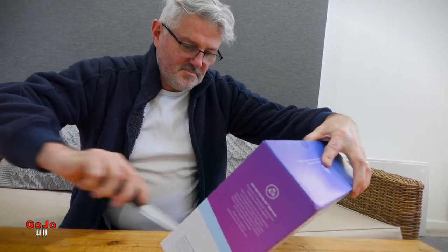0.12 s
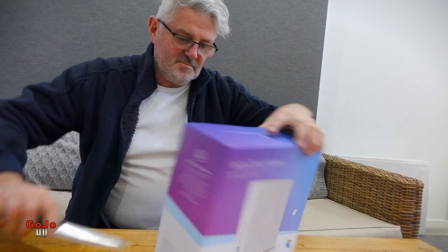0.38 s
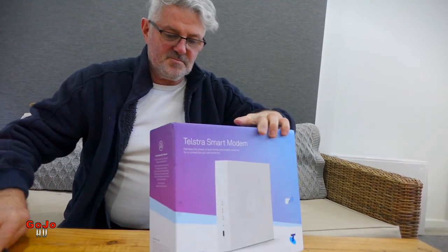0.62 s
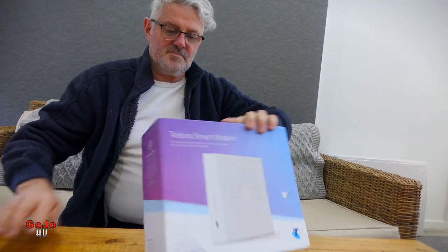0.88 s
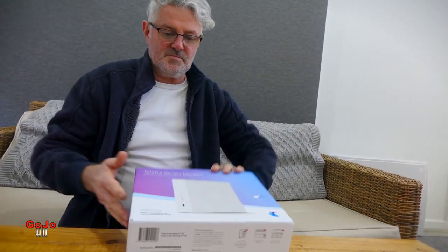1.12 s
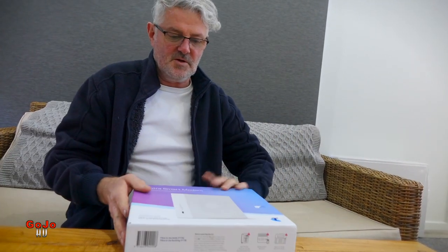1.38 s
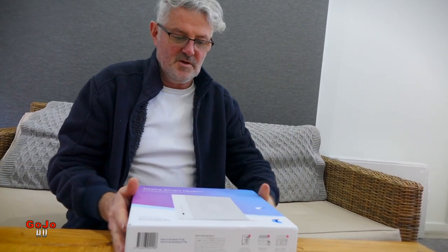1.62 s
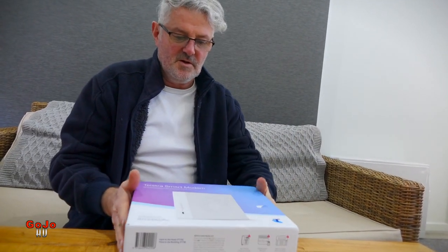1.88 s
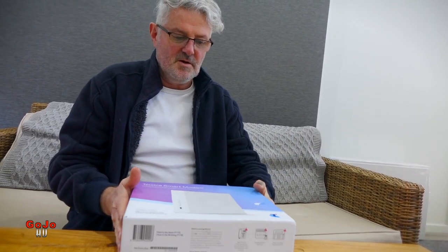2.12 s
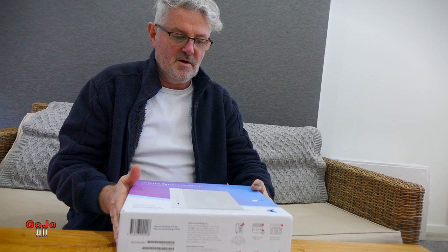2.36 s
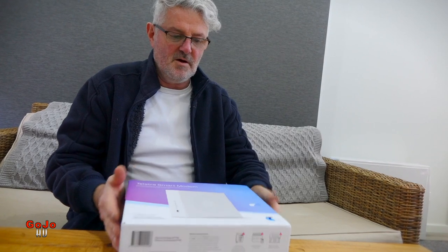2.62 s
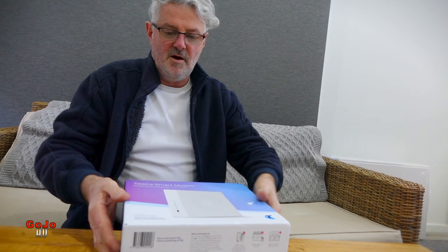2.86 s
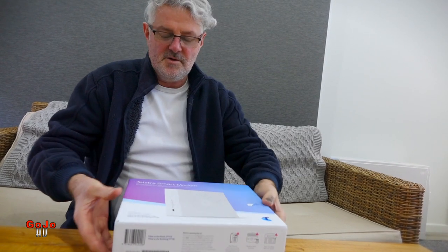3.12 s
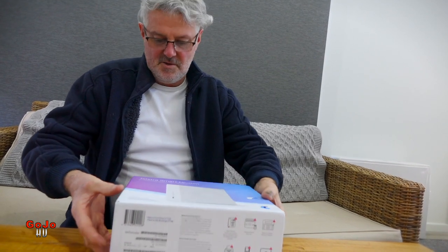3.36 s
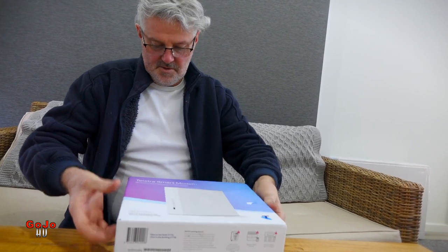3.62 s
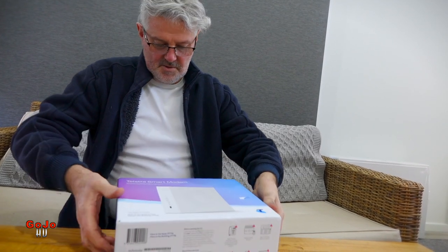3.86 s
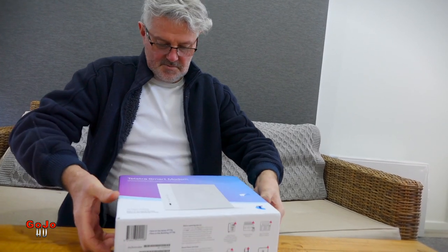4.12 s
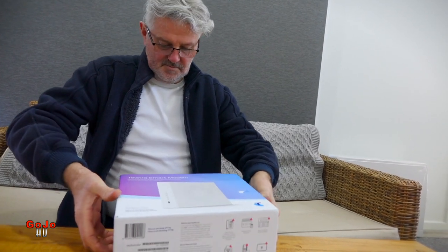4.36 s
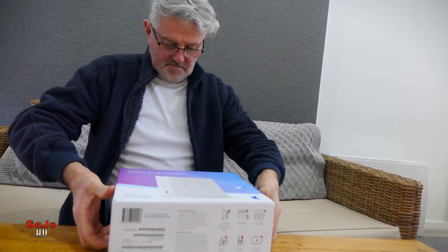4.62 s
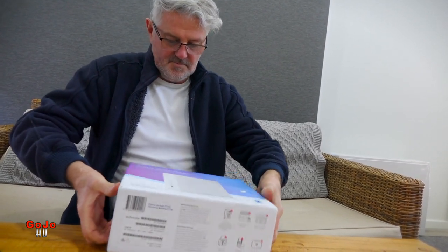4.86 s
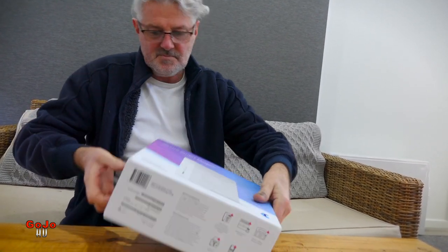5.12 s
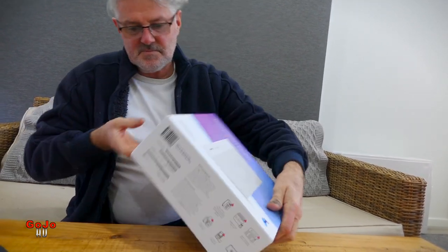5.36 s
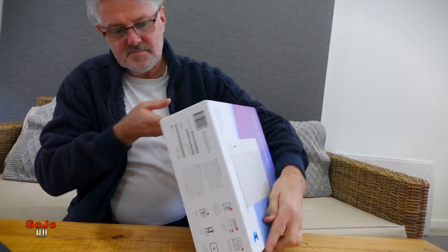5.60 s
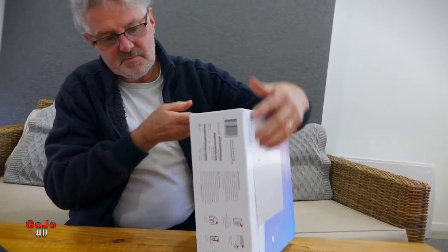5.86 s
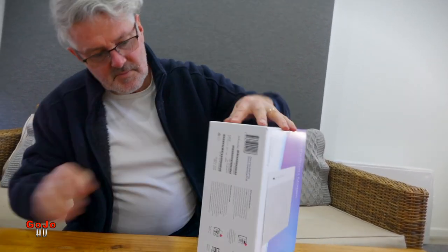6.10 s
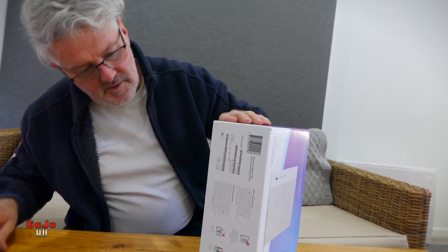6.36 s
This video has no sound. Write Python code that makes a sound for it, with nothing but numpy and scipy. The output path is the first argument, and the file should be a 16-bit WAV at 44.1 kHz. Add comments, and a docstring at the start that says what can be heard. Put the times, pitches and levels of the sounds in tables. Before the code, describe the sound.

Close, dry handling of a cardboard box at a wooden table. Sharp snaps and hollow knocks crowd the first second and a half, with gritty scraping between them. A solid knock follows in the middle, then soft shuffles, fingertip taps and brief rubbing. Near the end the box is turned and bumped lightly, with tiny skin squeaks. Slight short room echo over low steady background noise.

```python
"""A stiff cardboard box is cut, turned, set down and slid about on a wooden table in a small soft room.
Knocks make the box and the table top ring; edges and the blade tick in short cracks of noise.
Card drags on wood in many tiny catches, rasps under blade and fingers, and palms hiss over the glossy print.
Fingertips squeak now and then. A camera microphone with a presence peak hears it over a faint room rumble."""
import sys
import numpy as np
from scipy import signal
from scipy.fft import rfft, irfft
from scipy.io import wavfile
from scipy.ndimage import uniform_filter1d

SR = 44100
rng = np.random.default_rng(int(sys.argv[2]) if len(sys.argv) > 2 else 0)


def inscribe(sig):
    """Save sig as 16-bit PCM at rate SR to the path in sys.argv[1].

    A 1-D sig is mono; a 2-D sig holds one channel per row.
    Samples are clipped to [-1, 1] before scaling.
    """
    pcm = np.round(np.clip(np.atleast_2d(sig).T, -1, 1) * 32767)
    wavfile.write(sys.argv[1], SR, pcm.astype(np.int16))


def attenuation_scalar(level_db):
    """Turn a level in dB into a linear amplitude multiplier (20 dB per decade)."""
    decades = np.asarray(level_db, float) / 20
    return 10 ** decades


N = 285768  # length in samples


def unit(x):
    """Scale to an average (rms) level of 1."""
    return x / np.sqrt(np.mean(x ** 2))


def band(x, lo_hz, hi_hz, order=2):
    """Keep only the sound between two frequencies."""
    return signal.sosfilt(signal.butter(order, [lo_hz, hi_hz], "band", fs=SR, output="sos"), x)


def pushes(s, size):
    """Single-sample pushes at the given times in seconds."""
    out = np.zeros(N)
    np.add.at(out, np.minimum((s * SR).astype(int), N - 1), size)
    return out


def fade(s, size, tau):
    """Envelope that swells for tau seconds after each time, then dies away."""
    r = np.exp(-1 / (tau * SR))
    return signal.lfilter([np.e * (1 - r)], [1, -2 * r, r * r], pushes(s, size))


def ring(push, hz, t60):
    """One way the panel vibrates: each push of size 1 starts a fading sine of height 1."""
    w = 2 * np.pi * hz / SR
    r = np.exp(-np.log(1000) / (t60 * SR))
    return signal.lfilter([np.sin(w)], [1, -2 * r * np.cos(w), r * r], push)


def soften(push, hz):
    """Spread each push in time: broad panels take part of a cycle to get moving."""
    contact = np.hanning(int(.6 * SR / hz) + 3)
    return signal.lfilter(contact / contact.sum(), 1, push)


def walk(rate):
    """Wandering level that glides between random values, rate of them per second."""
    k = int(SR / rate)
    held = np.repeat(rng.standard_normal(N // k + 1), k)
    return uniform_filter1d(held, k)[:N]


def grit(rate, spread_db, smooth):
    """Stick-slip: uneven catches, none far above the rest, over a smooth share of noise."""
    size_db = spread_db * np.minimum(rng.exponential(size=N), 2)
    happens = rng.random(N) < rate / SR
    catch = happens * attenuation_scalar(size_db) * rng.standard_normal(N)
    return unit(catch) + smooth * rng.standard_normal(N)


def gestures(s, hold, rise, fade_s, db, rest_db):
    """Level in dB of overlapping movements; each climbs, holds and falls at its own pace."""
    t = np.arange(0, N + 128, 128) / SR
    before = (s - t[:, None]) / rise
    after = (t[:, None] - s - hold) / fade_s
    away = np.maximum(np.maximum(before, after), 0)
    power = np.sum(attenuation_scalar(db - 10 * away) ** 2, axis=1) + attenuation_scalar(rest_db) ** 2
    return np.interp(np.arange(N) / SR, t, 10 * np.log10(power))


SMALL_SPREAD_DB = 3.5


def small(count, level_db, top_db):
    """Chance moments, the level there (capped, then scattered), and two spare random draws each."""
    at = rng.integers(0, N, count)
    scatter, one, two = rng.standard_normal((count, 3)).T
    db = np.minimum(level_db[at], top_db) + SMALL_SPREAD_DB * scatter
    return at / SR, db, one, two


# colour of the still room: f/Hz, level/dB (only the shape counts)
ROOM_TONE = [(12, -14), (20, 15), (172, -34), (301, -2.5), (590, -51), (660, -13), (759, -18.5),
             (1150, -17), (1260, -19), (1810, -28.5), (2750, -30.5), (16000, -69)]
ROOM_TONE_DB = -44.5  # overall rms


def room_tone():
    """Steady noise of house and microphone: random noise shaped to the colour above."""
    hz, db = np.transpose(ROOM_TONE)
    f = np.fft.rfftfreq(N, 1 / SR)
    colour = attenuation_scalar(np.interp(np.log(f + 1), np.log(hz), db))
    return attenuation_scalar(ROOM_TONE_DB) * unit(irfft(rfft(rng.standard_normal(N)) * colour, N))


def room(x, t60_low, t60_high, split_hz, soft_hz):
    """Dense echoes after a few ms; cushions swallow the top and the treble dies first."""
    t = np.arange(int(.8 * SR)) / SR
    noise = rng.standard_normal(len(t))
    low = signal.sosfilt(signal.butter(1, split_hz, fs=SR, output="sos"), noise)
    tail = low * 1000 ** (-t / t60_low) + (noise - low) * 1000 ** (-t / t60_high)
    tail = tail * np.clip((t - .004) / 0.0033, 0, 1)
    tail = signal.sosfilt(signal.butter(2, soft_hz, fs=SR, output="sos"), tail)
    return signal.fftconvolve(x, tail / np.sqrt(np.sum(tail ** 2)))[:N]


# fingertip squeaks on the gloss: t/s, f/Hz, level/dB
SQUEAKS = [(5.759, 3880, -47), (6.266, 4800, -47), (6.344, 4500, -50), (6.344, 3660, -54)]


def squeaks():
    """Skin slips for a few ms at a high steady rate, heard as a tiny pure tone."""
    t = np.arange(N) / SR
    out = np.zeros(N)
    for s, hz, db in SQUEAKS:
        out += attenuation_scalar(db) * np.exp(-((t - s) / 0.0029) ** 2) * np.sin(2 * np.pi * hz * t)
    return out


# palms gliding over the gloss: start t/s, hold t/s, rise t/s per 10 dB, level/dB
PALMS = [(0, .02, .06, -69), (.165, .13, .02, -59), (.228, .015, .018, -47), (.465, .02, .05, -63),
         (.525, .01, .015, -58), (.562, .01, .015, -48), (.86, .19, .025, -58.5), (1.08, .02, .025, -46),
         (1.3, .02, .03, -53), (1.39, .01, .015, -55), (1.48, .015, .025, -52), (1.72, .01, .02, -60),
         (1.78, .01, .018, -58), (1.85, .07, .012, -55), (2.015, .01, .012, -53), (2.5, .115, .025, -54),
         (2.71, .08, .03, -59), (2.87, .05, .05, -67), (2.98, .012, .03, -61), (3.055, .01, .04, -66),
         (3.165, .01, .025, -66), (3.585, .01, .025, -64), (3.66, .045, .02, -52), (3.85, .03, .04, -58),
         (4.105, .01, .02, -57), (4.2, .05, .04, -64), (4.7, .07, .04, -66), (4.82, .06, .03, -67),
         (4.97, .16, .045, -61), (5.19, .05, .05, -57), (5.55, .17, .2, -57), (5.83, .11, .07, -48),
         (6.13, .01, .03, -63), (6.27, .02, .03, -55), (6.34, .05, .1, -65)]
PALM_FADE_OVER_RISE = 1.2
REST_HISS_DB = -79.5  # hands never quite leave the box


def palms(judder_db):
    """Skin on gloss makes many fine catches in smooth noise: a hiss that judders a little."""
    s, hold, rise, db = np.transpose(PALMS)
    hiss_db = gestures(s, hold, rise, PALM_FADE_OVER_RISE * rise, db, REST_HISS_DB)
    skin = grit(rate=2500, spread_db=1, smooth=2)
    hiss = unit(band(skin, 4900, 14800))
    return attenuation_scalar(hiss_db + 0.56 * judder_db) * hiss


# rasps of blade and fingers on the card: t/s of most pressure, rise t/s per 10 dB,
# fade t/s per 10 dB, level/dB
RASPS = [(0, .1, .15, -61), (.235, .033, .03, -34), (.29, .05, .12, -50), (.473, .1, .02, -54),
         (.527, .008, .055, -36), (.86, .015, .2, -40), (1.088, .03, .07, -36.5), (1.313, .1, .2, -53),
         (1.425, .1, .09, -50), (1.75, .04, .07, -52), (1.9, .1, .07, -55), (2.017, .05, .05, -55),
         (2.49, .05, .3, -58), (2.6, .08, .03, -58), (2.704, .03, .08, -44), (2.99, .06, .12, -57),
         (3.17, .05, .03, -58), (3.44, .3, .2, -64), (3.59, .025, .1, -58), (3.685, .035, .1, -41),
         (3.873, .15, .13, -52), (4.109, .02, .03, -41.5), (4.3, .2, .55, -57), (4.975, .08, .3, -59),
         (5.13, .2, .2, -57), (5.4, .1, .15, -57), (5.593, .25, .25, -56), (5.861, .045, .2, -50.5),
         (6.212, .08, .5, -55)]
REST_RASP_DB = -72


def rasp_level():
    """Level of the rasp in dB, following the pressure on the card."""
    s, rise, fade_s, db = np.transpose(RASPS)
    return gestures(s, 0, rise, fade_s, db, REST_RASP_DB)


def rasps(judder_db):
    """Blade and fingers catch on dense card fibres and rasp."""
    fibres = grit(rate=1000, spread_db=5.5, smooth=0.7)
    rasp = unit(band(fibres, 1000, 3770))
    return attenuation_scalar(rasp_level() + judder_db) * rasp


def strokes():
    """Rasp and hiss of the hands, juddering together."""
    judder_db = 2.5 * walk(70)
    return rasps(judder_db) + palms(judder_db)


SMALL_TICKS, TICK_OVER_RASP_DB = 75, 13
SMALL_TICK_TOP_DB = -42  # cap before the scatter


def small_ticks():
    """Ticks at chance moments, louder where the card is rubbed harder."""
    s, db, sharp, _ = small(SMALL_TICKS, rasp_level() + TICK_OVER_RASP_DB, SMALL_TICK_TOP_DB)
    return np.transpose([s, db, db - 17 + 6 * sharp])


# ticks of blade, nails and flap edges: t/s, main level/dB, top level/dB (both raised in ticks())
TICKS = [(.0422, -31.5, -47), (.1581, -12, -27.5), (.4753, -28.5, -38.5), (.483, -30, -44),
         (.4958, -25.5, -50), (.5196, -25, -39), (.5292, -13.5, -29), (.5626, -18, -35),
         (.7043, -30.5, -66), (.8046, -33, -57), (.8235, -26, -45), (.848, -9, -33), (.8654, -21, -56),
         (1.2471, -54, -36), (1.279, -34, -21), (1.296, -26, -46), (1.3189, -18, -43), (1.3636, -30, -38),
         (1.712, -40, -52), (1.7838, -38, -59), (2.0068, -27, -46), (2.0815, -46, -53), (2.2084, -40, -51),
         (2.3571, -56, -53), (2.4083, -45, -53), (2.4512, -42, -52), (2.692, -23, -37),
         (2.7074, -27, -37.5), (2.7806, -30.5, -70), (2.9238, -35, -47), (2.9467, -36, -52),
         (3.051, -36.5, -50), (3.1637, -41, -59), (3.2061, -44, -70), (3.2216, -40, -70),
         (3.3283, -44, -65), (3.4256, -38, -62), (3.4436, -33, -64), (3.458, -33, -70), (3.5972, -32, -65),
         (3.6386, -32, -43), (3.692, -20, -42), (4.0577, -26, -58), (4.0831, -35, -58), (4.0991, -26, -44),
         (4.4268, -39.5, -67), (4.6932, -42, -54), (4.7716, -41, -68), (4.814, -44, -53), (4.859, -29, -62),
         (4.9686, -34, -62), (4.9857, -36, -52), (5.0219, -31.5, -42.5), (5.1153, -38, -46),
         (5.1562, -35, -47), (5.4191, -37, -52), (5.8448, -28.5, -48), (5.882, -36, -50),
         (6.1335, -37.5, -53), (6.1848, -37, -63), (6.2272, -34, -64)]


def ticks():
    """Each tick is a short crack of noise, with an even shorter burst of treble of its own level."""
    s, db, top_db = np.vstack([TICKS, small_ticks()]).T
    noise = rng.standard_normal((2, N))
    crack = band(fade(s, attenuation_scalar(db + 1), 0.0011) * noise[0], 1000, 3750)
    treble = band(fade(s, attenuation_scalar(top_db + 7), 0.00024) * noise[1], 6000, 12800)
    return crack + treble


# drags of the card over the table: t/s of most weight, rise t/s per 10 dB, fade t/s per 10 dB,
# weight level/dB, scrape level/dB
DRAGS = [(0, .1, .3, -51, -59), (.2, .025, .15, -39, -49), (.56, .07, .065, -33, -39),
         (.89, .06, .27, -33, -31), (1.35, .1, .11, -39, -41), (1.75, .05, .35, -44, -55),
         (2.25, .3, .3, -51, -63), (2.46, .08, .11, -48, -57), (2.73, .06, .35, -37, -46),
         (3.5, .4, .2, -53, -54), (3.7, .06, .09, -40, -37), (3.9, .15, .07, -46, -44),
         (4.14, .08, .5, -44, -47), (4.36, .1, .08, -52, -51), (4.9, .2, .35, -43, -49),
         (5.17, .08, .1, -43, -50), (5.43, .12, .17, -43, -51), (5.7, .2, .2, -58, -57),
         (5.89, .04, .09, -44, -45), (6.18, .05, .09, -45, -53), (6.46, .15, .2, -46, -49)]
REST_DRAG_DB, REST_SCRAPE_DB = -60, -68


def drag_levels():
    """Levels in dB of the weight (low part) and scrape (high part) of the dragged card."""
    s, rise, fade_s, weight_db, scrape_db = np.transpose(DRAGS)
    drag_db = gestures(s, 0, rise, fade_s, weight_db, REST_DRAG_DB)
    return drag_db, gestures(s, 0, rise, fade_s, scrape_db, REST_SCRAPE_DB)


# ways the box vibrates (modes), rung by sliding() and knocks(): f/Hz, relative level/dB,
# t/s to fade by 60 dB when knocked
MODES_BOX = [(119.6, -11, 0.065), (152, 0, 0.05), (183.7, -3.5, 0.09), (204, -5, 0.08), (243.6, -1, 0.048),
             (262.4, -13, 0.14), (304, -1, 0.091), (357.7, -3.5, 0.14), (394.6, -2, 0.067),
             (463, -5.5, 0.14), (517, -2, 0.08), (585, -3, 0.056), (654.5, 0, 0.055), (722, -6, 0.048),
             (751, -3, 0.062), (888, -1, 0.033), (985, -3, 0.047), (1150, 2, 0.024), (1326, -1.5, 0.028),
             (1550, 0, 0.02), (1805, -3, 0.022), (2020, -3.5, 0.017)]


def sliding():
    """Catches of the dragged card shake the box modes, low and high, each with its own sign."""
    drag_db, scrape_db = drag_levels()
    judder_db = 2.5 * walk(40)
    catches = grit(rate=400, spread_db=3.5, smooth=.6) * attenuation_scalar(judder_db)
    low, high = np.zeros(N), np.zeros(N)
    for hz, db, t60 in MODES_BOX:
        sign = rng.choice([-1, 1])
        part = low if hz < 600 else high
        part += sign * attenuation_scalar(db) * ring(catches, hz, 0.75 * t60)  # fades sooner than a knock
    return attenuation_scalar(drag_db) * unit(low) + attenuation_scalar(scrape_db) * unit(high)


SMALL_TAPS, TAP_OVER_DRAG_DB, TAP_BODY_HZ = 40, 5, 190
SMALL_TAP_TOP_DB = -42  # cap before the scatter


def small_taps():
    """Light taps of the box at chance moments, louder where it is dragged harder."""
    s, db, place, hard = small(SMALL_TAPS, drag_levels()[0] + TAP_OVER_DRAG_DB, SMALL_TAP_TOP_DB)
    body_hz = TAP_BODY_HZ * np.exp(.25 * place)
    return np.transpose([s, db, body_hz, db - 3 + 4 * hard, db - 9])


def thuds(s, hz, db, cycles):
    """The dead first swing or two of the struck face, gone within a few cycles."""
    out = np.zeros(N + SR)
    t = np.arange(SR // 10) / SR
    for start, f, size in zip((s * SR).astype(int), hz, attenuation_scalar(db)):
        age = t * f / cycles
        swell = np.e * age * np.exp(-age * np.e)
        out[start:start + len(t)] -= size * swell * np.sin(2 * np.pi * f * t)
    return out[:N]


# knocks of the box: t/s, hollow body level/dB, centre of the body f/Hz, hard edge level/dB,
# table thump level/dB (levels are shifted in knocks())
KNOCKS = [(.158, -22, 330, -10, -55), (.18, -23, 176, -41, -46), (.275, -22, 185, -28, -42),
          (.521, -13, 190, -18, -13), (.528, -7, 180, -17, -22), (.562, -16, 208, -20, -41),
          (.597, -26, 452, -27, -33), (.704, -29, 400, -21, -57), (.804, -29, 265, -34, -40),
          (.848, -8, 400, .5, -34), (.865, -16, 400, -14, -38), (.904, -15, 402, -12, -51),
          (.916, -23, 368, -13, -47), (.942, -28, 256, -16, -40), (.995, -38, 398, -22, -60),
          (1.108, -16, 510, -12.5, -44), (1.32, -2, 172, -17, -26), (1.335, -16.5, 227, -40, -32),
          (1.362, -22, 191, -29, -51), (1.692, -37, 200, -50, -55), (1.719, -17, 236, -30, -40),
          (1.746, -33, 180, -29, -44), (1.896, -33, 162, -44, -44), (2.008, -37, 227, -29, -46),
          (2.02, -32, 165, -29, -39), (2.449, -34, 178, -34, -60), (2.692, -5, 240, -12, -15),
          (2.707, -9, 510, -13, -30), (2.723, -15, 480, -21, -23), (2.78, -45, 433, -27, -48),
          (2.924, -38, 180, -31, -54), (3.05, -37, 159, -31, -60), (3.167, -40, 167, -38, -42),
          (3.206, -34, 274, -33, -45), (3.327, -36, 169, -32, -57), (3.426, -39, 132, -30, -46),
          (3.444, -30, 340, -30, -49), (3.596, -35, 132, -30, -36), (3.636, -27, 193, -36, -38),
          (3.654, -27, 173, -38, -33), (3.683, -23, 164, -31, -29), (3.691, -24, 724, -26, -32),
          (3.704, -28, 238, -21, -45), (3.721, -25, 184, -28, -34), (3.904, -31, 191, -38, -38),
          (4.085, -28, 361, -26, -44), (4.097, -20, 185, -26, -40), (4.192, -33, 176, -40, -48),
          (4.239, -23, 178, -34, -47), (4.312, -38, 186, -37, -48), (4.399, -44, 178, -45, -40),
          (4.469, -35, 164, -50, -51), (4.694, -40, 305, -32, -60), (4.774, -40, 165, -31, -55),
          (4.86, -23, 190, -22, -36), (4.969, -33, 458, -28, -55), (5.022, -35, 248, -26, -50),
          (5.117, -26, 175, -26, -47), (5.152, -25, 191, -37, -36), (5.167, -28, 250, -36, -44),
          (5.211, -34, 248, -44, -41), (5.396, -31, 254, -30, -41), (5.414, -26, 198, -38, -35),
          (5.517, -34, 260, -27, -58), (5.846, -16, 260, -17, -26), (5.857, -24, 270, -29, -34),
          (5.885, -40, 266, -29, -52), (5.917, -36, 242, -32, -50), (6.093, -45, 418, -34, -58),
          (6.135, -25, 178, -33, -51), (6.185, -31, 130, -24, -35), (6.23, -34, 280, -29, -39),
          (6.42, -34, 390, -24, -32), (6.437, -30, 390, -32, -49)]
EDGE_HZ, EDGE_CENTRE_HZ = 850, 1080  # modes above the first follow the edge level
TABLE_HZ, TABLE_T60_S = 73, 0.155


def knocks():
    """Each blow thuds, rings the modes near its body and edge centres and thumps the table."""
    s, body_db, body_hz, edge_db, thump_db = np.vstack([KNOCKS, small_taps()]).T[:, :, None]
    hz, mode_db, t60 = np.transpose(MODES_BOX)
    spot = rng.standard_normal((len(s), len(hz)))
    # modes far from a centre, in octaves, ring less, down to a floor
    hollow_db = body_db - 3.5 + np.maximum(-14 * np.log2(hz / body_hz) ** 2, -22)
    hard_db = edge_db - 8.5 + np.maximum(-12 * np.log2(hz / EDGE_CENTRE_HZ) ** 2, -12)
    # panels mostly cave inward together; the struck spot flips a few and sets their strength
    sign = np.where(spot > .6, 1, -1)
    blow_db = np.where(hz > EDGE_HZ, hard_db, hollow_db)
    size = sign * attenuation_scalar(blow_db + mode_db + 2.13 * np.abs(spot))
    s = s[:, 0]
    box = np.zeros(N)
    for m in range(len(hz)):
        push = soften(pushes(s, size[:, m]), hz[m])
        box += ring(push, hz[m], t60[m])
    table_push = soften(pushes(s, attenuation_scalar(thump_db[:, 0] + 3)), TABLE_HZ)
    table = ring(table_push, TABLE_HZ, TABLE_T60_S)
    return box + table + thuds(s, body_hz[:, 0], body_db[:, 0] + 1, cycles=1.5)


def scene():
    """Hits with their echoes, sliding, strokes and room tone."""
    hits = knocks() + ticks() + squeaks()
    wet = attenuation_scalar(-15) * room(hits, t60_low=0.51, t60_high=0.36, split_hz=4000, soft_hz=4250)
    return (hits + wet + sliding() + strokes() + room_tone())[None]


def roll_off(x):
    """The treble ends steeply here."""
    return signal.sosfilt(signal.butter(12, 17010, fs=SR, output="sos"), x)


PRESENCE_HZ, PRESENCE_WIDTH_HZ, PRESENCE_DB = 3510, 340, 4.5


def record(dry):
    """Bass cut and presence peak of the microphone, then clipping at full scale."""
    x = signal.sosfilt(signal.butter(2, 28, "high", fs=SR, output="sos"), dry)
    half_hz = PRESENCE_WIDTH_HZ / 2
    peak = band(x, PRESENCE_HZ - half_hz, PRESENCE_HZ + half_hz, order=1)
    x = x + (attenuation_scalar(PRESENCE_DB) - 1) * peak
    return roll_off(np.clip(x, -1, 1))


dry = scene()
out = record(dry)
inscribe(out)
```